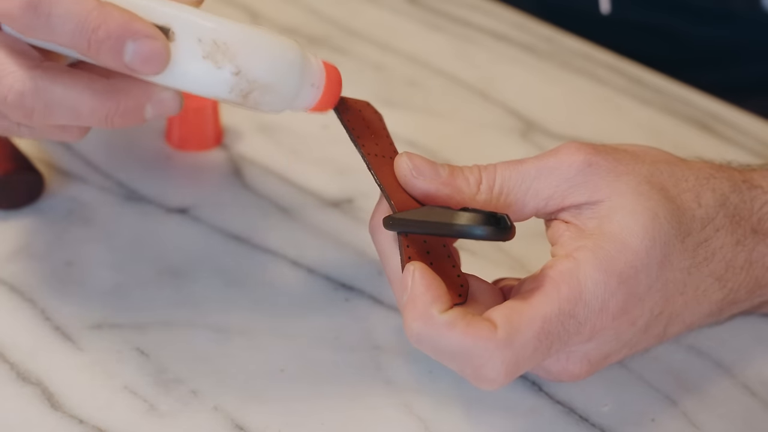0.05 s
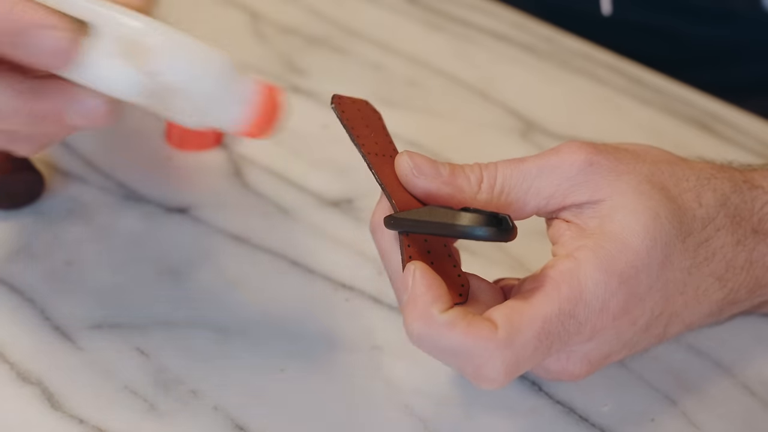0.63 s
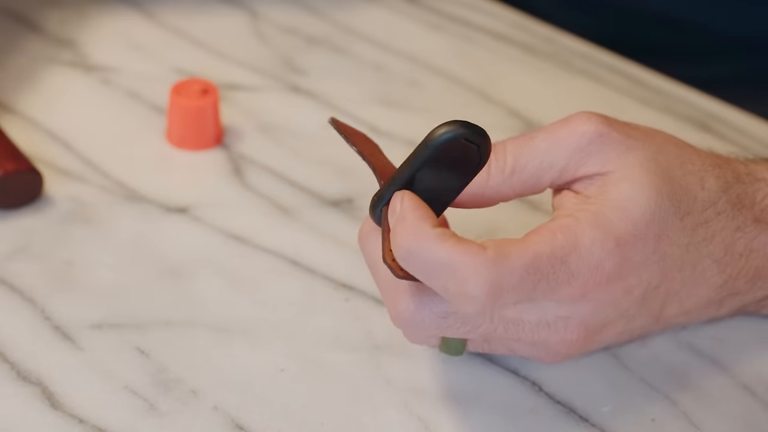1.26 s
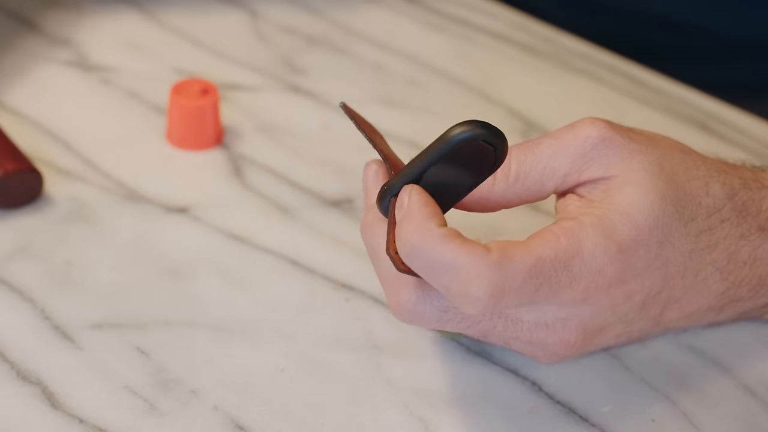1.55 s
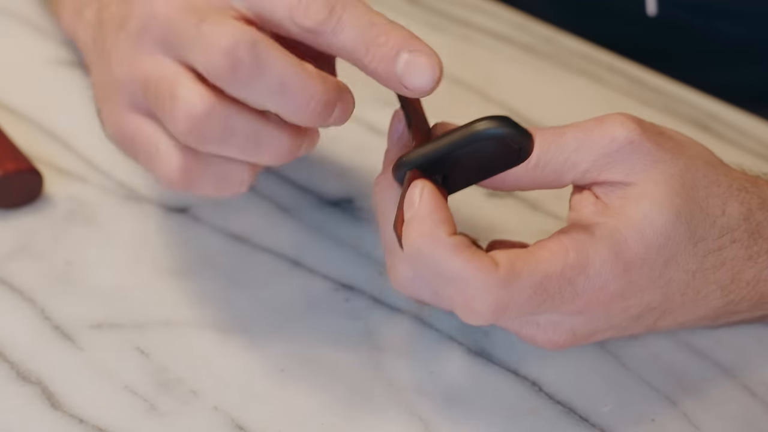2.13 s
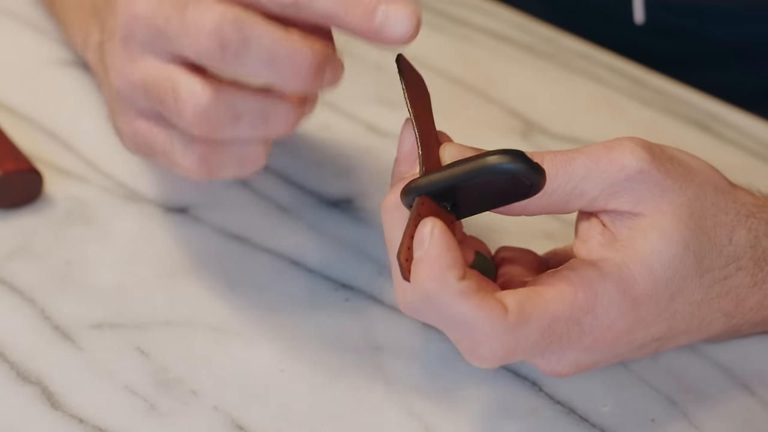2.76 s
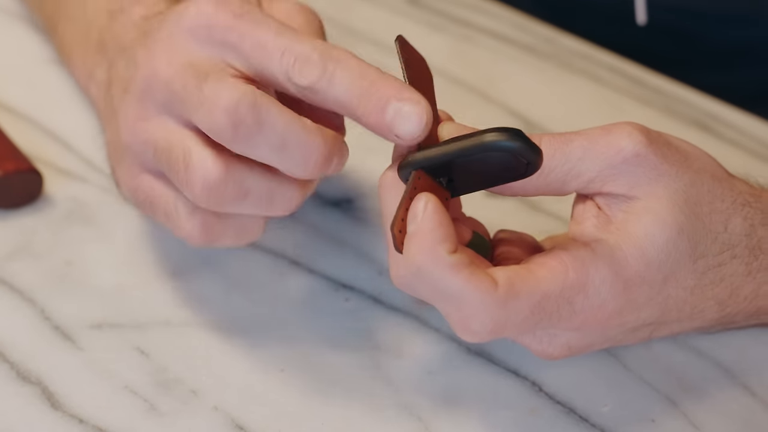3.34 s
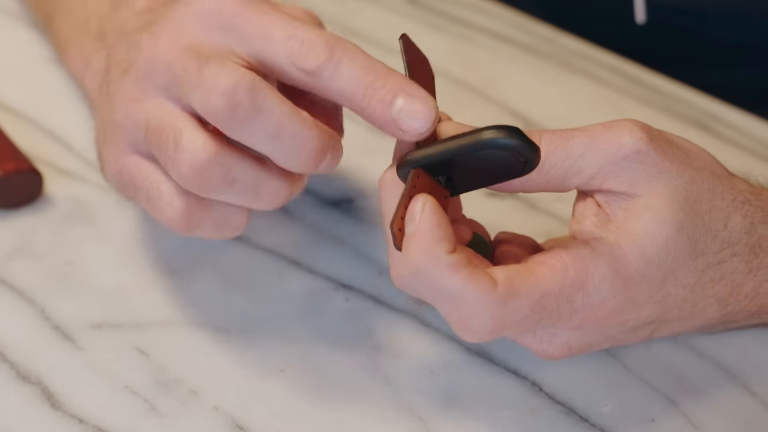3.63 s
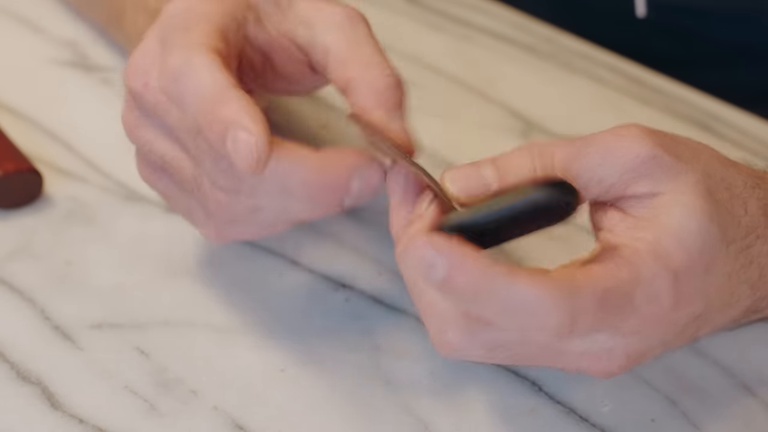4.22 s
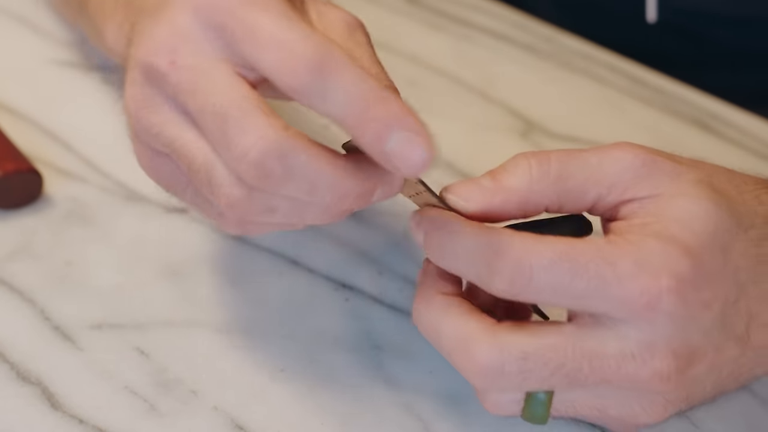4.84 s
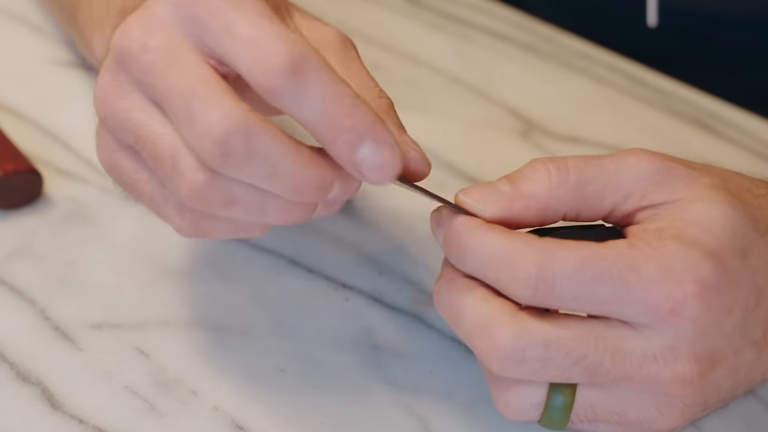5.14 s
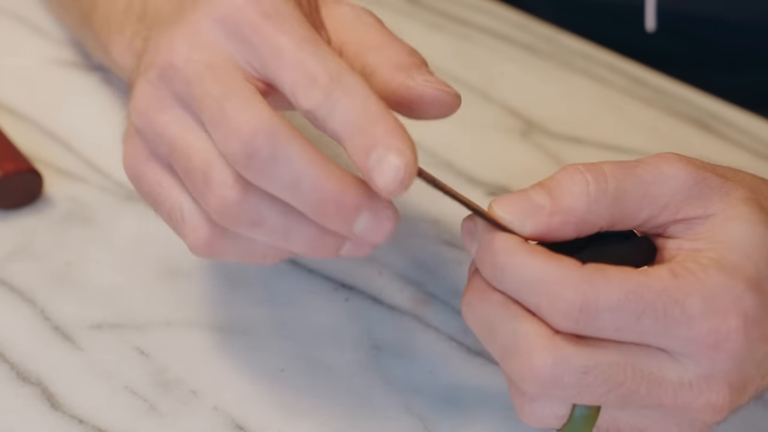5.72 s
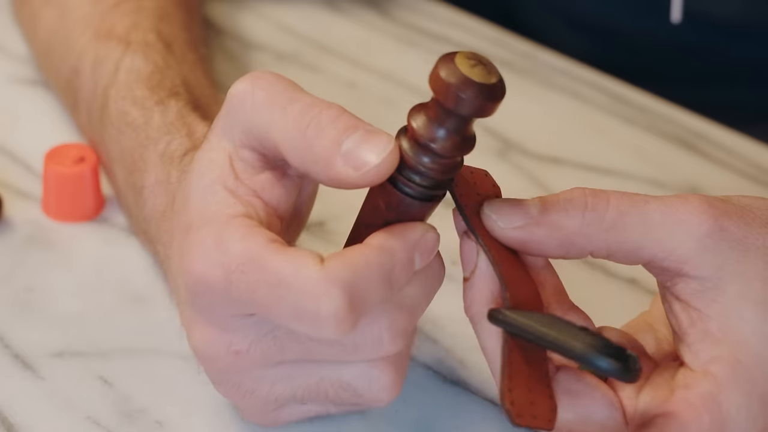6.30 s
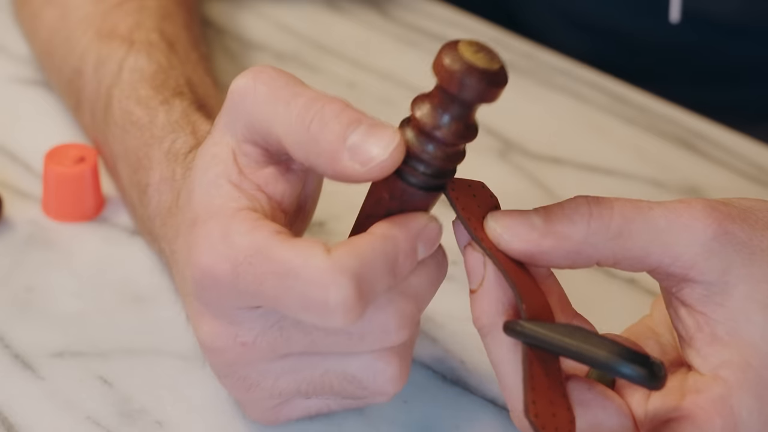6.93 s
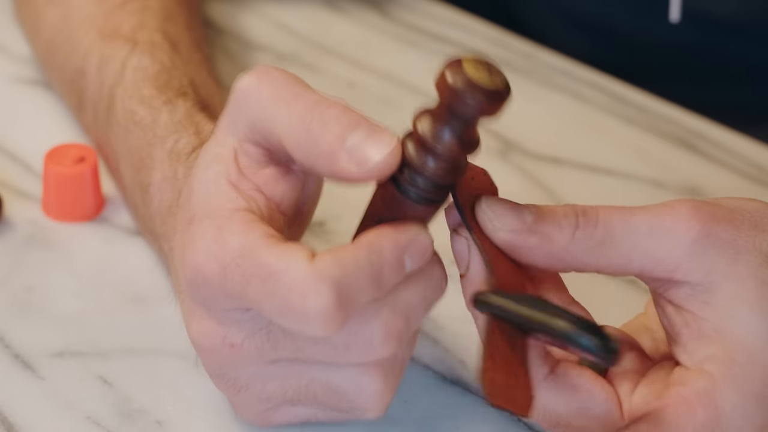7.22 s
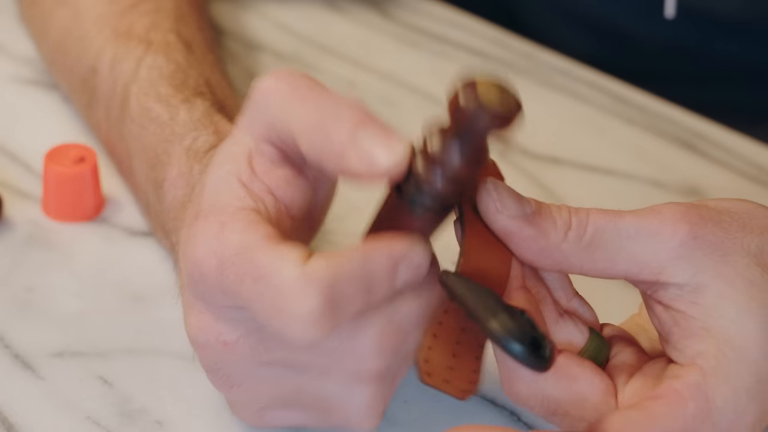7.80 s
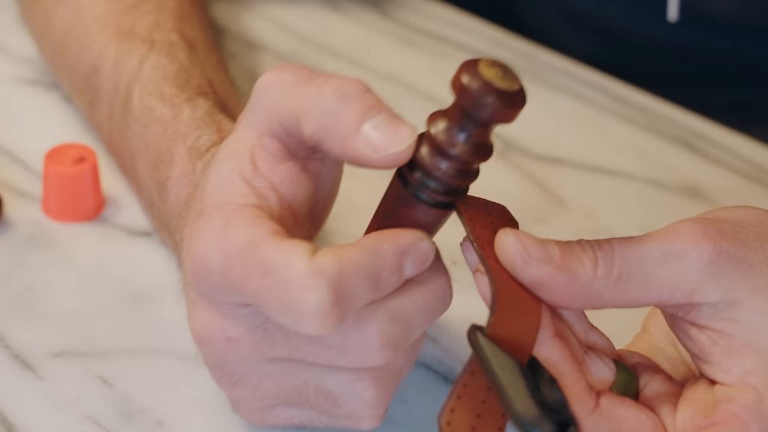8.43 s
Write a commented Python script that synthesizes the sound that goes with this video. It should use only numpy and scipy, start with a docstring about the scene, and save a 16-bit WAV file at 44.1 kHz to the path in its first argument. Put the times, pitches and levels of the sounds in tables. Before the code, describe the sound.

Close, quiet leather work in a small room, over a low ventilation hum. After a few tiny ticks, a plastic bottle clacks and thuds onto the table, the loudest sound. Fingers slide softly along a leather strap, which creaks and squeaks as the grip changes. Then a wooden tool rubs the edge in rapid strokes, squealing faintly and knocking once against the strap's fitting, with soft bumps near the end.

```python
"""Close, quiet leather work at a stone-topped table, over a low ventilation rumble. First a bottle nozzle
dabs along a strap's edge in small ticks and creaks. The bottle is put down: its shell clacks, the table
thuds. A fingertip spreads the paste with a papery hiss, and the strap squeaks as the hands change grip.
From about six seconds a wooden slicker burnishes the edge in quick strokes, squealing faintly on the
hardest. It knocks once against the strap's fitting, and a few dull bumps sit under the last strokes."""
import sys
import numpy as np
from scipy import signal
from scipy.fft import rfft, irfft
from scipy.io import wavfile

SR = 44100
rng = np.random.default_rng(int(sys.argv[2]) if len(sys.argv) > 2 else 0)


def waveform_to_disk(signal):
    """Save audio, clipped to [-1, 1], as 16-bit WAV at the path in sys.argv[1]."""
    frames = np.transpose(np.atleast_2d(signal))
    scaled = np.clip(frames, -1, 1) * 32767
    samples = np.round(scaled).astype(np.int16)
    wavfile.write(sys.argv[1], SR, samples)


N = 377496
HZ = np.fft.rfftfreq(N, 1 / SR)
TIME = np.arange(N) / SR
RING_TIME = TIME[:SR // 4]

# Runs of to-and-fro slicker strokes. Each row: start and end in seconds, stroke count,
# extra length of a push in seconds, top-band trim in dB.
STROKE_RUNS = [(6.211, 7.071, 11, 0.013, -5.5), (7.187, 7.338, 2, 0.0087, -14), (7.349, 7.735, 4, .022, -1),
               (7.73, 8.103, 4, -.012, -1), (8.118, 8.606, 6, .002, -3)]
# How hard the hand leans on the slicker. Each row: time in seconds, level in dB.
PRESSURE = [(6.24, -66.5), (6.32, -63), (6.57, -66.5), (7.03, -66), (7.23, -63), (7.49, -65.5),
            (7.585, -60), (7.8, -57.5), (8.05, -58), (8.16, -71.5), (8.4, -64), (8.56, -70)]
# Tone of wood rubbing leather. Each row: frequency in Hz, level in dB.
WOOD_EQ = [(200, 5), (600, 9), (1100, 7.5), (1550, 11), (2100, -6.5), (3200, -1.5), (4200, -5),
           (6300, -6.5), (7800, -5), (11000, -3.5), (12500, -10), (16000, -13)]
# Resonances of the rubbed wood. Each row: centre in Hz, width in Hz, boost in dB.
WOOD_PEAKS = [(2660, 390, 1.1), (3450, 360, 3.3), (4910, 650, 11.6), (5470, 300, 6.6), (6830, 320, 4.2),
              (8900, 600, 3.8), (10500, 700, 2)]
# The slicker hits the fitting. Each row: time in seconds, level in dB.
KNOCKS = [(7.802, -27)]
# The bottle meets the table. Each row: time in seconds, trims in dB for sway, thud, hollow, shell
# and crack, hardness as a cut-off in Hz, room send in dB.
BOTTLE_BLOWS = [(1.2904, -22, -10, -11, -9.5, -3, 11960, 1.5),
                (1.2994, -15.5, -21, -22, 1.5, -3.5, 8500, 0),
                (1.311, -27, -32, -36.5, -10, -30, 2600, -0.5),
                (1.6161, -32, -1.5, -43, -23.5, -4.5, 2700, 3)]
# Ring of the struck slicker, the table's sway and thud, the bottle's hollow and shell, and the bumps.
# Each row: frequency in Hz, level in dB, time to fall 60 dB in seconds.
SLICKER_MODES = [(420, -15, 0.034), (680, -36, 0.014), (950, -10, 0.021), (1310, -4.5, .014),
                 (1580, -2, 0.016), (2670, -1.5, 0.0093), (4400, -6, 0.0068), (4970, 0, .016),
                 (5700, -17, .012), (9350, -15, 0.024)]
SWAY_MODES = [(76.4, -1.5, .11), (185, -4, .1)]
THUD_MODES = [(113, -25, .1), (148, -16.5, .13), (239, -15, 0.052), (334, -9, 0.027), (429.2, 0, .019),
              (526, -8.5, 0.013), (670, -17, 0.028)]
HOLLOW_MODES = [(865, -3, 0.012)]
SHELL_MODES = [(2240, -19, 0.0085), (2780, -12, .009), (3080, -3, .009), (3920, 0, .006),
               (4400, -3, 0.0044), (5650, -5.5, 0.0055), (6500, -4, .005), (7500, -1, .005),
               (8200, -12.5, 0.0045)]
BUMP_MODES = [(235, -12.5, 0.12), (342, -1, 0.072), (404, 1.5, 0.059), (483, -6.5, 0.072)]
# Fingers slide on leather. Each row: start and end in seconds, level in dB.
FINGER_RUBS = [(.68, .77, -71.5), (.78, 1.278, -68), (0.979, 1.066, -58.5), (2.069, 2.15, -68.5),
               (2.378, 2.5, -63), (2.66, 2.773, -66), (2.886, 2.997, -68.5), (3.248, 3.425, -66),
               (3.457, 3.55, -60), (3.581, 3.712, -66.5), (3.741, 3.824, -64.5), (3.857, 3.906, -67),
               (3.934, 4.12, -66), (4.181, 4.68, -69.5), (4.692, 4.756, -59), (4.769, 4.98, -65.5),
               (5.028, 5.177, -67.5), (5.37, 5.436, -67), (5.591, 5.66, -72.5), (5.824, 5.903, -65.5)]
# Tone of rubbing skin, of a hard contact's crack, and of the hiss in creaks and taps.
# Each row: frequency in Hz, level in dB.
SKIN_EQ = [(300, -16), (900, 4), (1500, 2.5), (2300, -5), (3300, 2.5), (5000, 2), (6600, -1), (7800, -3),
           (9700, -1.5), (12000, -5.5), (15500, -7)]
CRACK_EQ = [(100, -12), (900, -3.5), (1300, -14), (2400, -2.5), (4500, 3), (7500, -.5), (9500, -9),
            (12000, -15), (16000, -22)]
HISS_EQ = [(500, -8), (1500, -1), (3500, -0.5), (6500, -2.5), (8000, -8.5), (11000, -7.5), (16000, -10)]
# Resonances of the finger rub and of the squeaking strap. Each row: centre in Hz, width in Hz, gain in dB.
SKIN_PEAKS = [(3397, 700, 2.5), (4970, 600, 1), (6590, 700, 4.5), (9500, 980, 1.5)]
SQUEAK_PEAKS = [(4650, 590, -2), (5250, 550, -0.5), (6700, 200, 1), (10100, 900, -9), (11000, 600, -13),
                (12100, 700, -15)]
# The strap squeaks through a tight grip. Each row: start and end in seconds, level in dB.
SQUEAKS = [(4.308, 4.495, -69.5), (4.63, 4.7, -64), (4.783, 4.81, -54), (4.845, 4.891, -48),
           (4.885, 5.15, -72.5), (4.987, 5.03, -66.5), (7.265, 7.325, -65), (8.308, 8.325, -61),
           (8.454, 8.47, -63)]
# Leather sticks and slips. Each row: start and end in seconds, level in dB, resonance in Hz.
CREAKS = [(.095, 0.142, -65, 1990), (0.282, .318, -63, 2090), (.587, 0.61, -63.5, 1770),
          (4.24, 4.258, -53.5, 1900), (4.251, 4.306, -57, 1590), (4.693, 4.737, -58, 2300),
          (6.319, 6.357, -56, 1400), (7.204, 7.247, -60, 1490), (8.057, 8.09, -54, 1480)]
# Ticks of nail, nozzle and fitting. Each row: time in seconds, level in dB, pitch in Hz, snap trim in dB.
TICKS = [(.474, -56, 2300, 3), (.553, -46, 1670, -3), (0.908, -50, 1880, -8.5), (1.052, -50.5, 2200, -7.5),
         (2.888, -52, 2200, 0), (4.402, -45.5, 9000, 2), (4.625, -47, 2930, 5), (4.696, -46, 2420, -1),
         (5.923, -39.5, 1250, -3), (6.343, -35, 562, -16), (6.413, -45, 1500, -15), (7.348, -45, 1450, -16)]
# Soft, dull bumps. Each row: time in seconds, level in dB.
BUMPS = [(6.343, -41.5), (8.15, -40.5), (8.2, -35.5), (8.263, -35.5), (8.318, -40.5), (8.358, -50)]
# Decay of the room. Each row: frequency in Hz, time to fall 60 dB in seconds.
ROOM_T60 = [(100, 0.9), (400, 0.57), (1000, 0.45), (2500, 0.5), (5000, 0.36), (9000, 0.35), (15000, 0.02)]
# Tone of the room's tail and of the ventilation. Each row: frequency in Hz, level in dB.
ROOM_EQ = [(80, -17), (200, -14), (420, -12.5), (720, -17), (1200, -14), (2000, -14.5), (3000, -16.5),
           (5000, -16.5), (8000, -17.5), (10000, -20), (15000, -22)]
VENTILATION_EQ = [(20, -18.5), (33, -10), (48, 6.5), (88, 9), (130, 1.5), (190, -4), (450, -6), (700, -12),
                  (930, -5.5), (1120, -16), (1550, -16), (2200, -27), (5000, -29.5), (15500, -32)]


def burnishing(usual_db=-64, body_db=-61.5, body_follows=0.46, mid_db=-2.5, top_db=-2.2):
    """The edge runs through the slicker's groove and stirs the wood; the body partly follows pressure."""
    shape_db = curve(WOOD_EQ, HZ) + sum(db * bell(hz, width) for hz, width, db in WOOD_PEAKS)
    texture = grit(per_s=5000, spread_db=0.5, patchy_db=1.4)
    moves = [(start, end, body_db + body_follows * (db - usual_db), db + mid_db, db + top_db + trim_db)
             for start, end, db, trim_db in strokes()]
    return friction(moves, texture, shape_db, taper=0.62, top_taper=1.2, uneven_db=2.5)


def strokes(push_db=0.47, turn_rest_s=.007):
    """Pulls alternate with firmer pushes. Each row: start and end in seconds, level and top trim in dB."""
    rows = []
    for start, end, count, push_longer_s, trim_db in STROKE_RUNS:
        turns = np.linspace(start, end, round(count) + 1)
        for begin, finish in zip(turns, turns[1:]):
            push = 1 if len(rows) % 2 else -1
            extra = (push * push_longer_s - turn_rest_s) / 2
            db = np.interp((begin + finish) / 2, *np.transpose(PRESSURE)) + push * push_db
            rows.append((begin - extra, finish + extra, db, trim_db))
    return rows


def chatter(slow_hz=5200, fast_hz=5700, hardest_db=-61.0, growth=2.2):
    """Hard strokes start to squeal; the hoarse pitch rises with the speed of the stroke."""
    level, hz = np.zeros(N), slow_hz * np.ones(N)
    peak_pressure = max(db for _, db in PRESSURE)
    for start, end, db, _ in strokes():
        speed = arch(start, end, taper=1.1)
        add(level, start, amp(hardest_db + growth * (db - peak_pressure)) * speed)
        add(hz, start, (fast_hz - slow_hz) * speed / speed.max())
    return level * whistle(hz, width_hz=370, overtone_db=-16)


def bottle():
    """Each blow sways and thuds the table and rings the bottle; returns direct sound and room send."""
    out, rattle = np.zeros((2, N)), noise(CRACK_EQ)
    for s, sway_db, thud_db, hollow_db, shell_db, crack_db, hard_hz, send_db in BOTTLE_BLOWS:
        crack = click(CRACK_EQ) + amp(-14) * burst(rattle, t60=0.023)
        clack = amp(shell_db - 7.5) * ring(SHELL_MODES) - amp(crack_db) * crack
        # a softer contact loses the treble
        clack = signal.lfilter(*signal.butter(1, hard_hz, fs=SR), clack)
        table = amp(thud_db) * ring(THUD_MODES) - amp(sway_db) * ring(SWAY_MODES)
        heavy = table + amp(hollow_db) * ring(HOLLOW_MODES)
        # the heavy parts take a moment to get moving
        blow = -clack - heavy * (1 - np.exp(-RING_TIME / .0011))
        add(out[0], s, blow)
        add(out[1], s, amp(send_db) * blow)
    return signal.sosfilt(signal.butter(3, 58, "high", fs=SR, output="sos"), out)


def fingers(usual_db=-67.5, body_db=-71.5, body_follows=0.2506, mid_db=-4.0, top_db=-3.5):
    """Skin on leather: a soft rub with papery resonances; a firmer rub gains mostly hiss."""
    shape_db = curve(SKIN_EQ, HZ) + sum(db * bell(hz, width) for hz, width, db in SKIN_PEAKS)
    texture = grit(per_s=9000, spread_db=1.5, patchy_db=1.4)
    moves = [(start, end, body_db + body_follows * (db - usual_db), db + mid_db, db + top_db)
             for start, end, db in FINGER_RUBS]
    return friction(moves, texture, shape_db, taper=.6, top_taper=.85, uneven_db=1.5, size=49152)


def squeaks(pitch_hz=4950, tone_db=-6, rasp_db=-1):
    """The grip gives way at once; very fast slips whistle hoarsely and stir the strap's resonances."""
    level = np.zeros(N)
    for start, end, db in SQUEAKS:
        speed = arch(start, end, taper=0.22)
        add(level, start, amp(db) * evened(speed * np.linspace(1, .55, len(speed))))
    resonances = sum(amp(db) * bell(hz, width) for hz, width, db in SQUEAK_PEAKS)
    rasp = colour(grit(per_s=6000, spread_db=-2.0, patchy_db=-0.5), resonances)
    tone = whistle(pitch_hz * (1 + .012 * wander(29.86)), width_hz=210, overtone_db=-0.5)
    return level * (amp(tone_db) * tone + amp(rasp_db) * rasp)


def creaks(usual_slips_per_s=310, usual_db=-58, db_per_doubling=10.5, hiss_db=-65.5):
    """Uneven trains of slips, each a short rasp through one soft resonance of the strap."""
    out, hiss, unsteady = np.zeros(N), noise(HISS_EQ), wander(150)
    for start, end, db, hz in CREAKS:
        speed = arch(start, end, taper=0.74)
        span = slice(round(start * SR), round(start * SR) + len(speed))
        # harder creaks slip faster, while their hiss stays the same
        rate = usual_slips_per_s * 2 ** ((db - usual_db) / db_per_doubling)
        cycles = np.cumsum(rate * np.exp(.45 * unsteady[span])) / SR
        slips = 0.28 + np.exp(-(cycles % 1) / 0.19)
        body = signal.lfilter(*signal.iirpeak(hz, 3.5, SR), slips * rng.standard_normal(len(speed)))
        add(out, start, speed * (amp(db) * evened(body) + amp(hiss_db) * evened(slips * hiss[span])))
    return out


def taps():
    """Small ticks, and the slicker's knock; such small things radiate no bass."""
    out, hiss = np.zeros(N), noise(HISS_EQ)
    for s, db, hz, snap_db in TICKS:
        body = ring([(hz, 0, .012), (hz * 1.4, -4, .009)])
        snap = amp(snap_db - 3.5) * burst(hiss, t60=0.011)
        add(out, s, amp(db - 1.5) * (body + snap))
    for s, db in KNOCKS:
        crack = amp(-3) * click(CRACK_EQ) + amp(-14) * burst(hiss, t60=0.039)
        add(out, s, amp(db) * (ring(SLICKER_MODES) + crack))
    return signal.sosfilt(signal.butter(2, 330, "high", fs=SR, output="sos"), out)


def bumps():
    """Low, dull bumps with a soft attack."""
    out = np.zeros(N)
    for s, db in BUMPS:
        add(out, s, amp(db + 0.5) * ring(BUMP_MODES) * (1 - np.exp(-RING_TIME / .006)))
    return out


def room(send):
    """A small room: dense reflections, each band dying at its own speed."""
    hz, t, bands = signal.stft(rng.standard_normal(SR), SR, nperseg=256)
    t60 = curve(ROOM_T60, hz)[:, None]
    decay = amp(curve(ROOM_EQ, hz)[:, None] - 60 * t / t60)
    equal_energy = np.sqrt(2 * np.log(1000) / (t60 * SR))
    tail = signal.istft(bands * decay * equal_energy, SR, nperseg=256)[1][:SR]
    fade_in = np.clip(TIME[:SR] / 0.00595, 0, 1)
    return signal.fftconvolve(send, tail * fade_in)[:N]


def ventilation(level_db=-54.5):
    """A steady bed of rumble and thin hiss."""
    return amp(level_db) * noise(VENTILATION_EQ)


def friction(moves, texture, shape_db, taper, top_taper, uneven_db, size=32768):
    """Sliding noise. Each move: start and end in seconds, then body, mid and top levels in dB."""
    hz, out = np.fft.rfftfreq(size, 1 / SR), np.zeros(N)
    low = 1 / (1 + (hz / 2600) ** 10)
    high = 1 - 1 / (1 + (hz / 7500) ** 10)
    bands = np.sqrt(np.clip([low, 1 - low - high, high], 0, 1))
    for start, end, *bands_db in moves:
        # every new contact favours slightly different resonances
        contact_db = uneven_db * np.interp(hz, np.linspace(0, SR / 2, 80), rng.standard_normal(80))
        at = rng.integers(N - size)
        rub = rfft(texture[at:at + size]) * amp(np.interp(hz, HZ, shape_db) + contact_db)
        # the higher bands need more speed, so they gather in the middle of the move
        for band, db, band_taper in zip(bands, bands_db, np.linspace(taper, top_taper, len(bands))):
            speed = arch(start, end, band_taper)
            add(out, start, amp(db) * speed * evened(irfft(rub * band)[:len(speed)]))
    return out


def grit(per_s, spread_db, patchy_db):
    """Fibres catch and let go: tiny clicks of uneven size, in clumps."""
    size = amp(spread_db * np.minimum(rng.exponential(1, N), 4))
    clicks = rng.standard_normal(N) * size * (rng.random(N) < per_s / SR)
    return clicks * amp(patchy_db * wander(70))


def whistle(hz, width_hz, overtone_db):
    """A hoarse friction tone with its octave: level and phase shake at random; rms 1."""
    phase = 2 * np.pi * np.cumsum(hz) / SR + 0.97 * wander(width_hz)
    return evened(wander(width_hz) * (np.cos(phase) + amp(overtone_db) * np.cos(2 * phase)))


def arch(start, end, taper):
    """Speed of one slide, up from rest and back; more taper narrows the swell; rms 1."""
    length = max(round((end - start) * SR), 9)
    return evened(np.sin(np.linspace(0, np.pi, length)).clip(0) ** taper)


def ring(modes):
    """A struck body rings as dying sines."""
    return sum(amp(db - 60 * RING_TIME / t60) * np.sin(2 * np.pi * hz * RING_TIME)
               for hz, db, t60 in modes)


def click(eq, size=2048):
    """The tightest causal click with a given tone; peak 1."""
    log_gain = np.log(amp(curve(eq, abs(np.fft.fftfreq(size, 1 / SR)))))
    pulse = np.fft.ifft(np.exp(np.conj(signal.hilbert(log_gain)))).real
    return np.pad(pulse / abs(pulse).max(), (0, len(RING_TIME) - size))


def burst(source, t60):
    """A slice of noise with an instant attack and a dying tail."""
    at = rng.integers(N - len(RING_TIME))
    fade = amp(-60 * RING_TIME / t60)
    return evened(source[at:at + len(fade)] * fade) * np.sqrt(np.mean(fade ** 2))


def noise(eq):
    """Steady noise through an EQ curve; rms 1."""
    return colour(rng.standard_normal(N), amp(curve(eq, HZ)))


def wander(rate_hz):
    """Smooth random modulation; rms 1."""
    return colour(rng.standard_normal(N), np.exp(-(HZ / rate_hz) ** 2))


def colour(x, gain):
    """Filters by one gain per frequency; rms 1."""
    return evened(irfft(rfft(x) * gain, N))


def bell(hz, width):
    """Gain of a resonance, 1 at its top."""
    return 1 / (1 + ((HZ - hz) / width * 2) ** 2)


def curve(points, hz):
    """Joins (Hz, value) points on a log-frequency axis."""
    point_hz, value = np.transpose(points)
    return np.interp(np.log(hz + 1), np.log(point_hz), value)


def add(mix, s, sound):
    """Mixes a sound in at s seconds."""
    part = mix[round(s * SR):][:len(sound)]
    part += sound[:len(part)]


def amp(db):
    """Decibels to gain."""
    return 10 ** (np.asarray(db) / 20)


def evened(x):
    """Scales to rms 1."""
    return x / np.sqrt(np.mean(x ** 2) + 1e-20)


def scene():
    """The mono mix: the hands sit up close; the table and the bumps stir more of the room."""
    hands = fingers() + burnishing() + chatter() + squeaks() + creaks() + taps()
    blows, blows_send = bottle()
    dull = bumps()
    reverb = room(blows_send + amp(-3.0) * hands + amp(7.5) * dull)
    return (hands + blows + dull + reverb + ventilation())[None]


def record(dry, ceiling=.88, cutoff_hz=15800):
    """Peaks overload just under full scale; then a steep low-pass trims the top."""
    limited = np.clip(dry, -ceiling, ceiling)
    low_pass = signal.firwin(511, cutoff_hz, window=("kaiser", 9), fs=SR)
    return signal.oaconvolve(limited, low_pass[None], "same")


dry = scene()
out = record(dry)
waveform_to_disk(out)
```